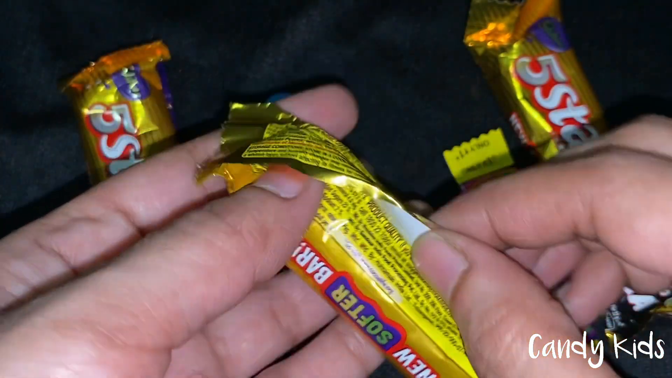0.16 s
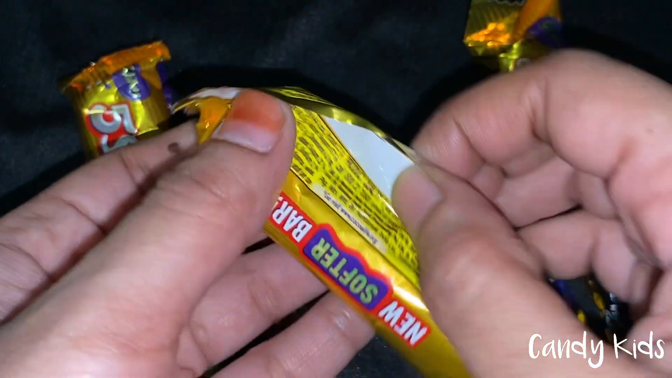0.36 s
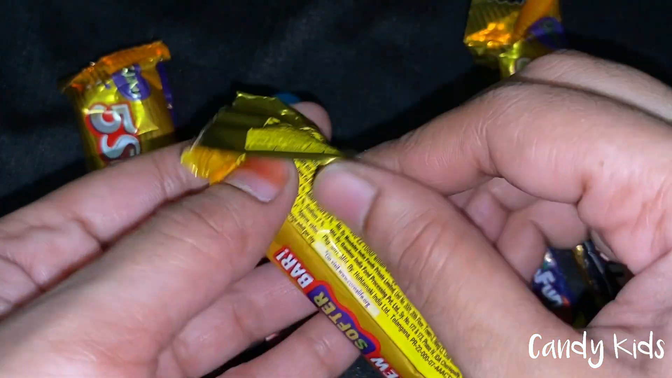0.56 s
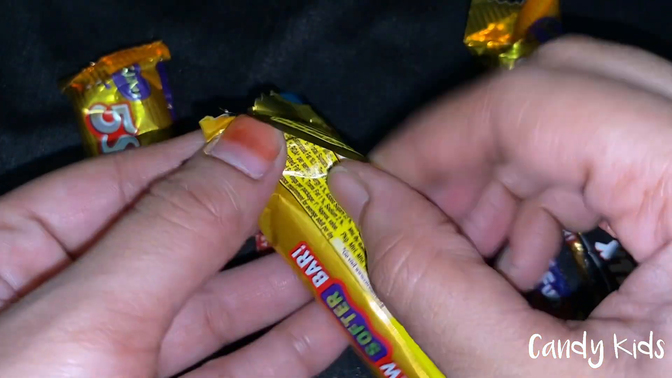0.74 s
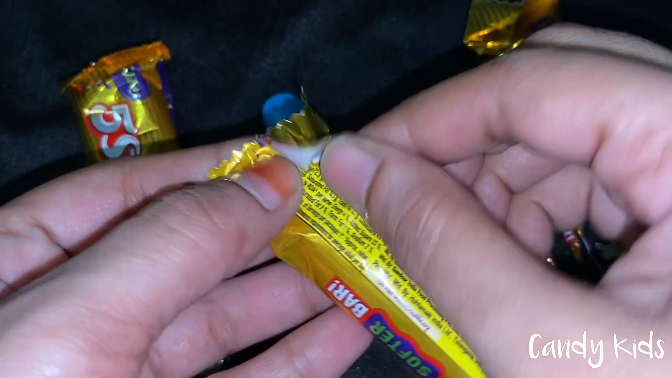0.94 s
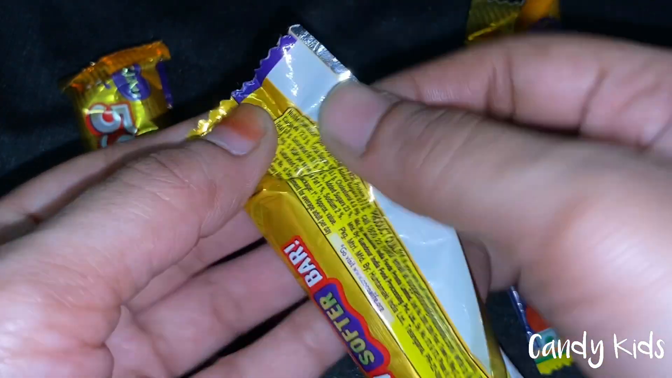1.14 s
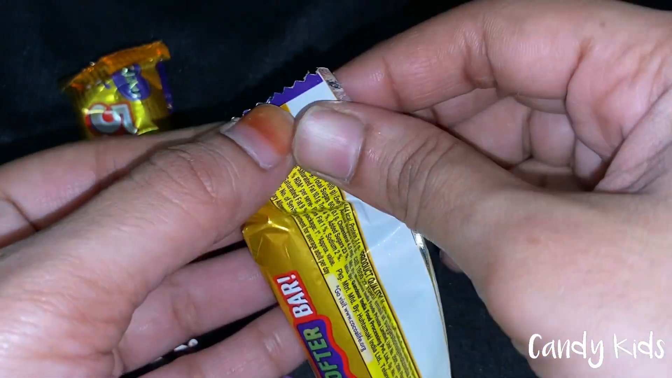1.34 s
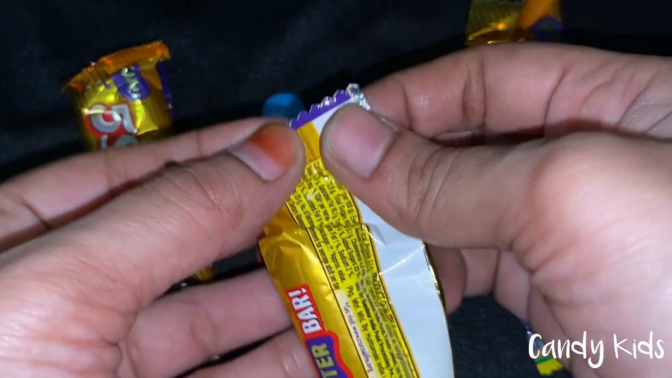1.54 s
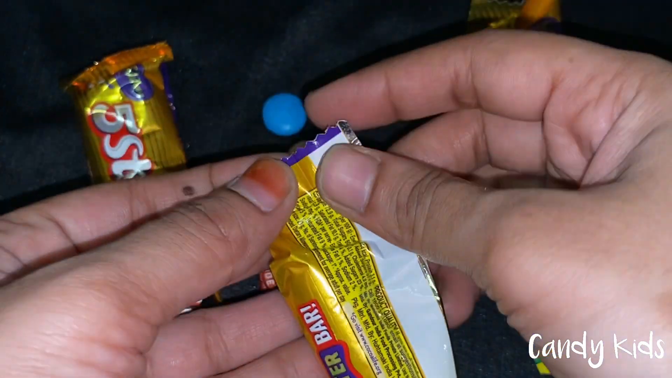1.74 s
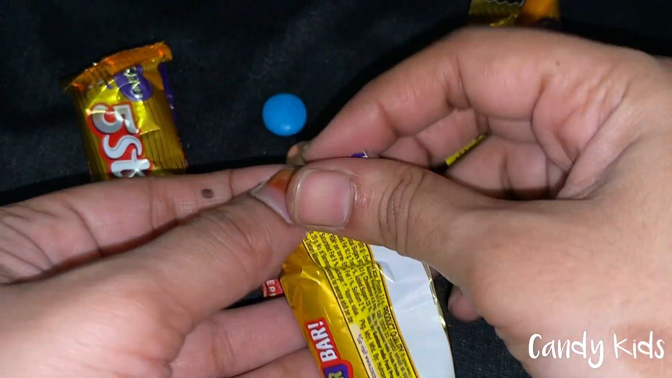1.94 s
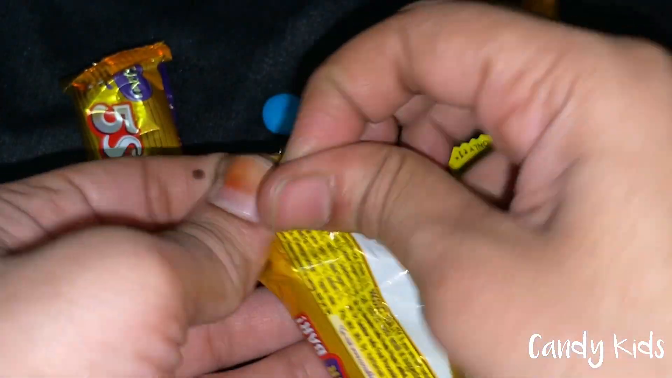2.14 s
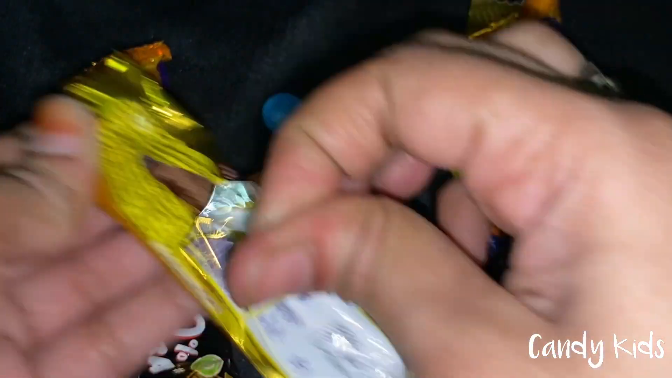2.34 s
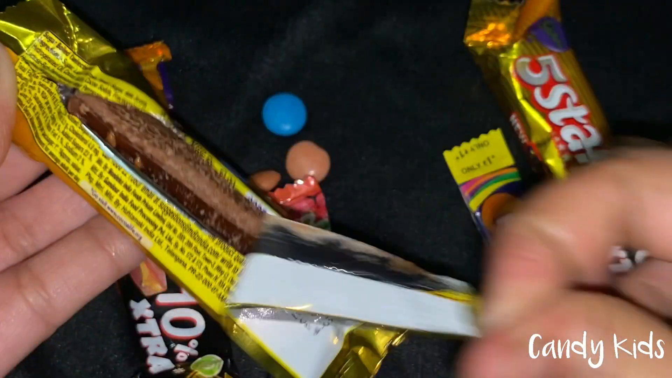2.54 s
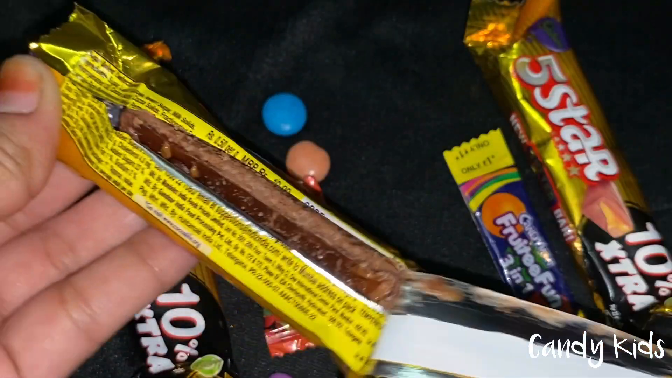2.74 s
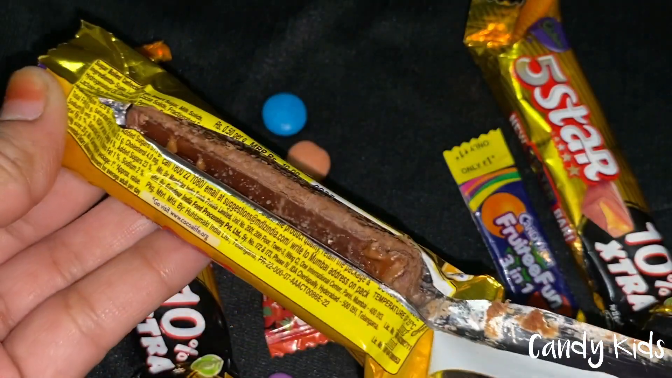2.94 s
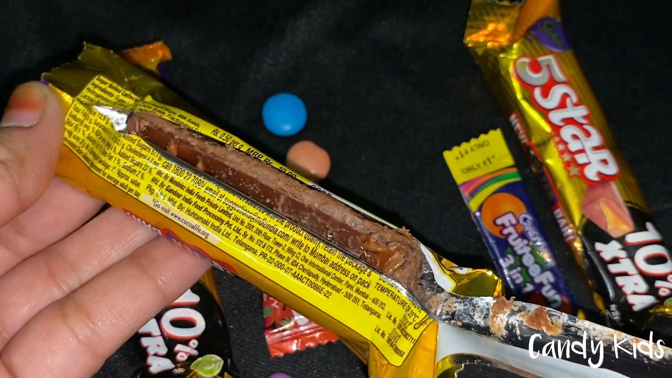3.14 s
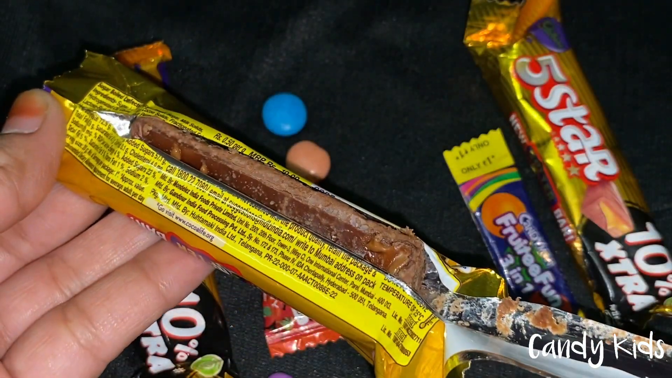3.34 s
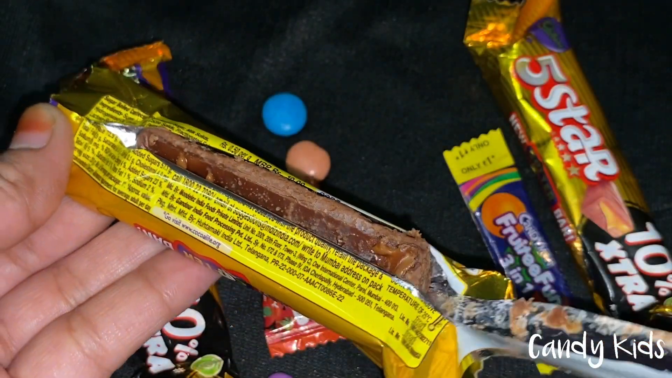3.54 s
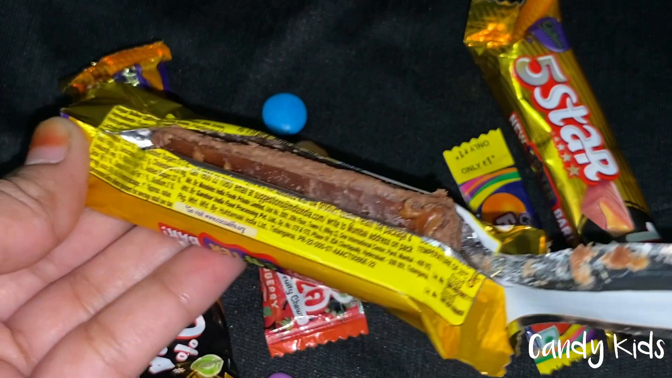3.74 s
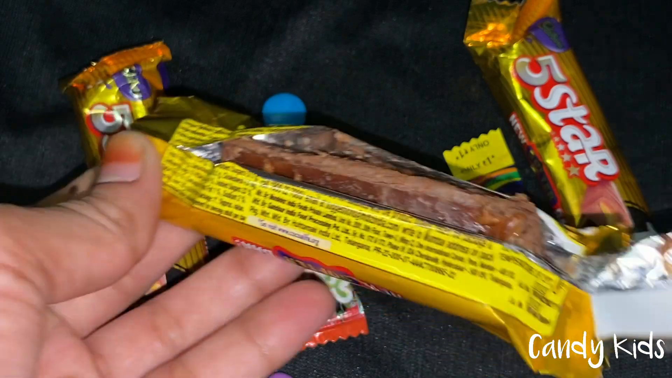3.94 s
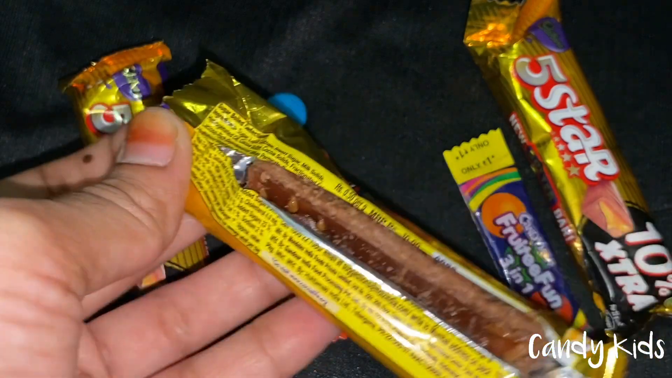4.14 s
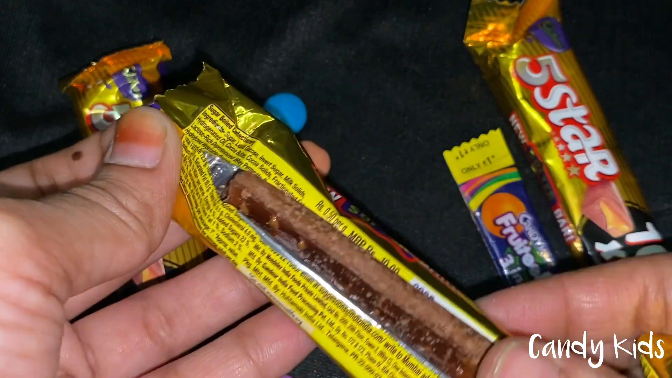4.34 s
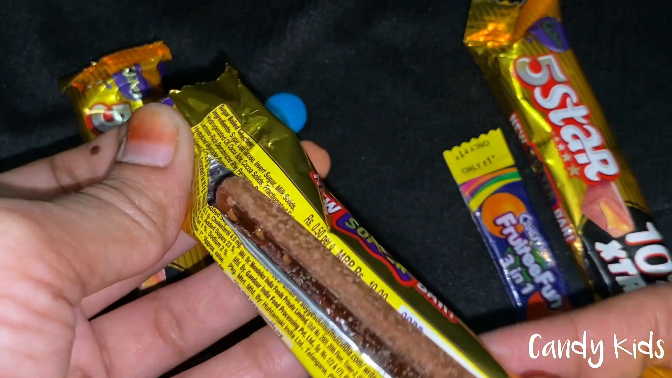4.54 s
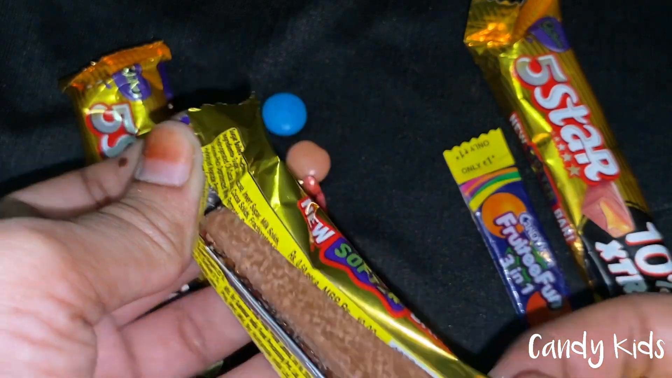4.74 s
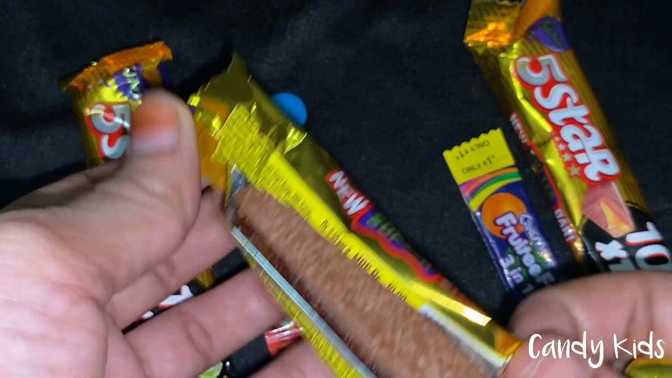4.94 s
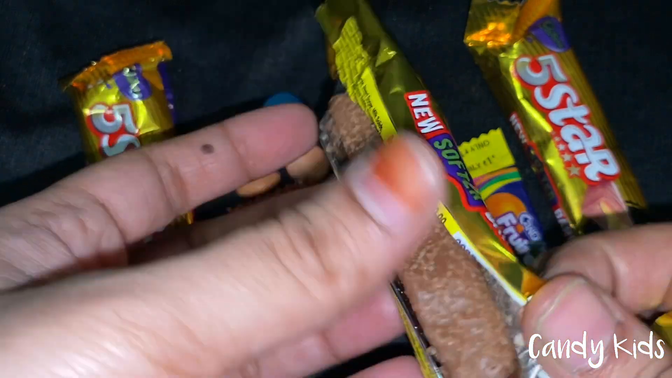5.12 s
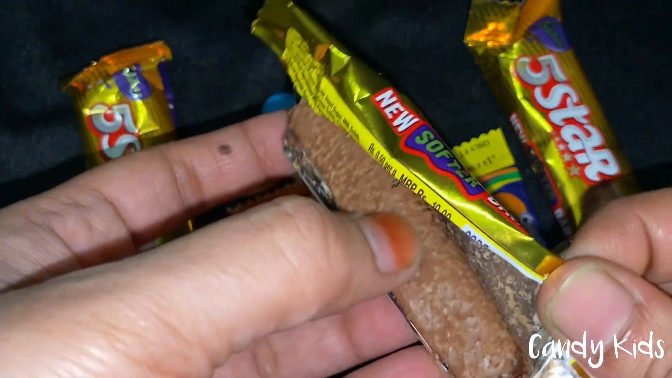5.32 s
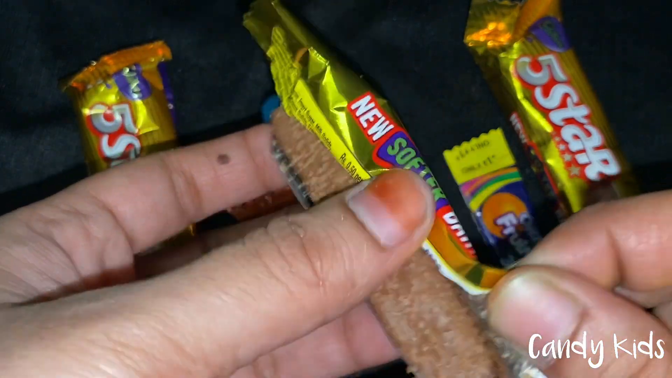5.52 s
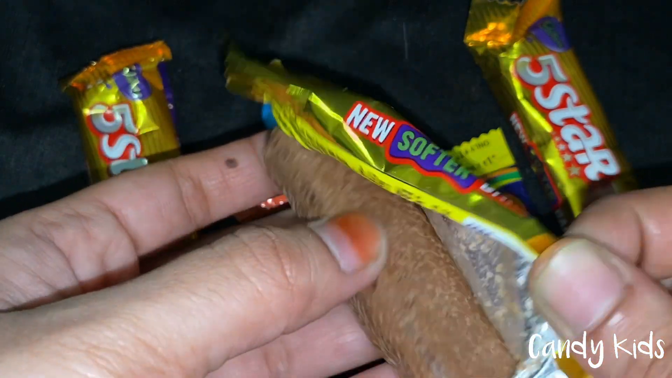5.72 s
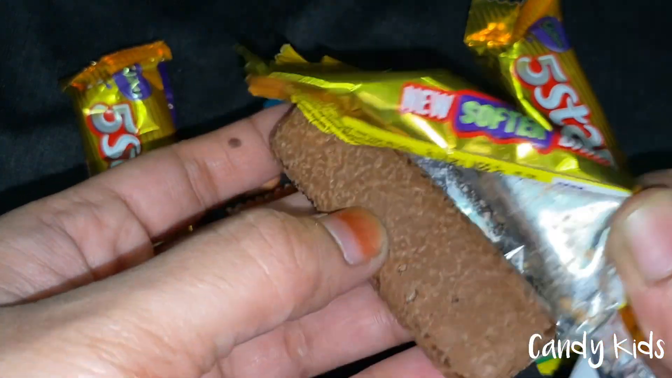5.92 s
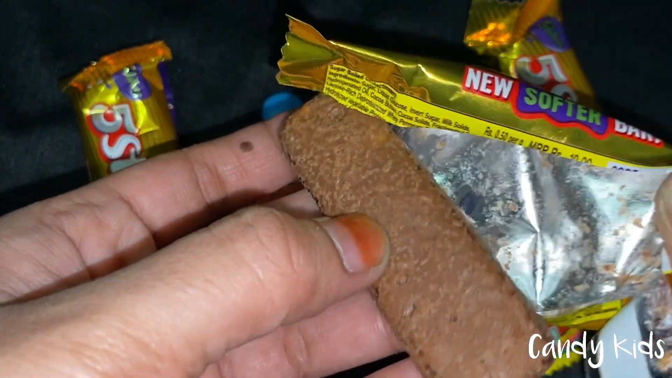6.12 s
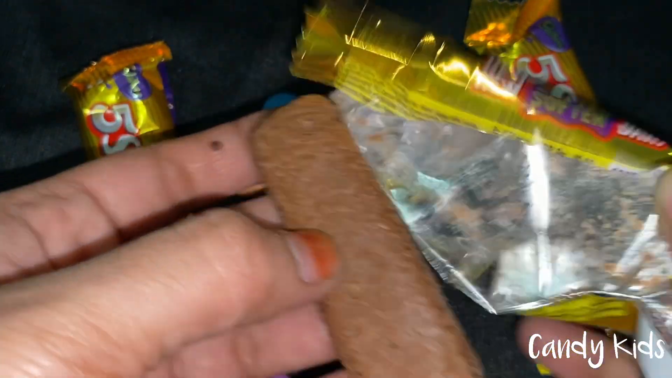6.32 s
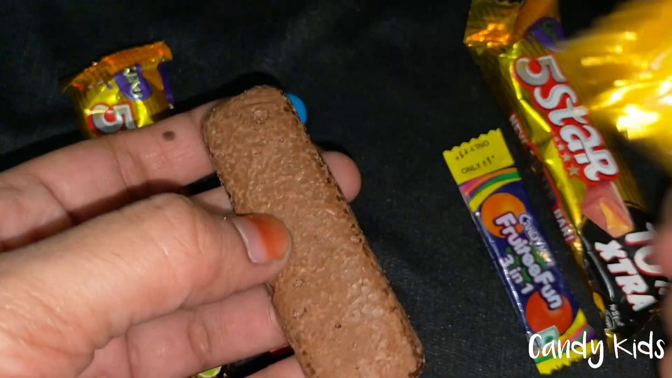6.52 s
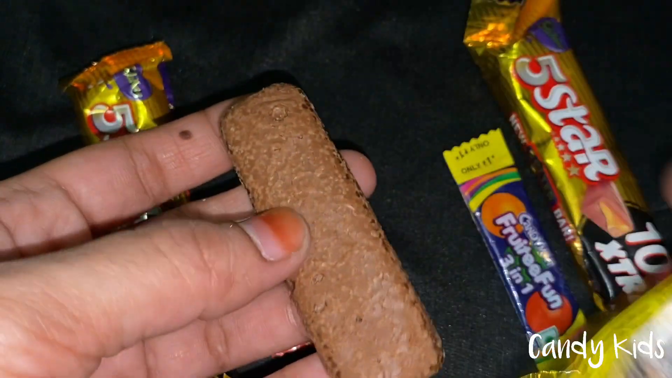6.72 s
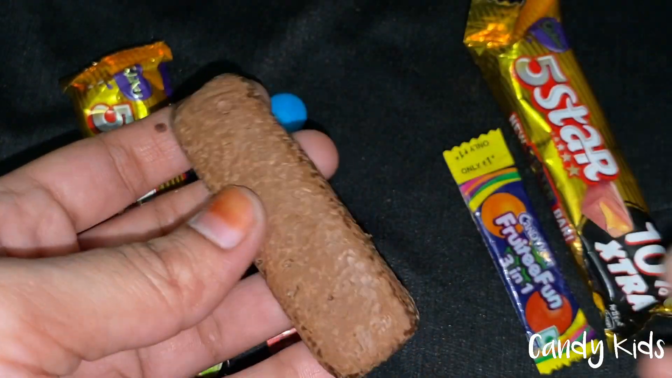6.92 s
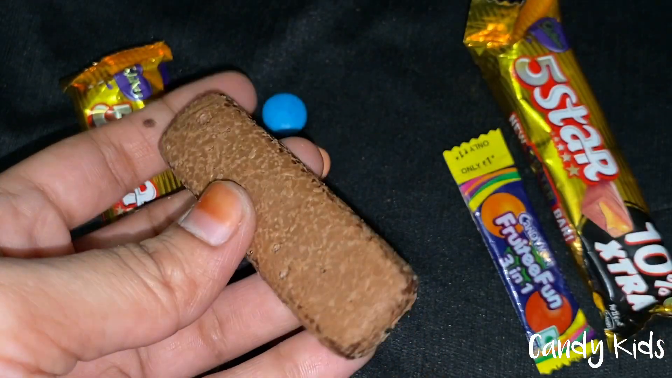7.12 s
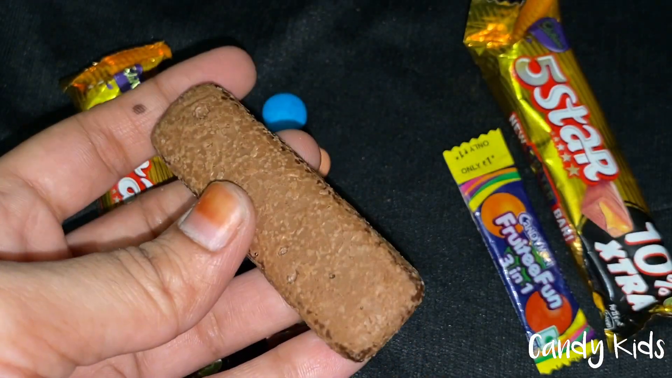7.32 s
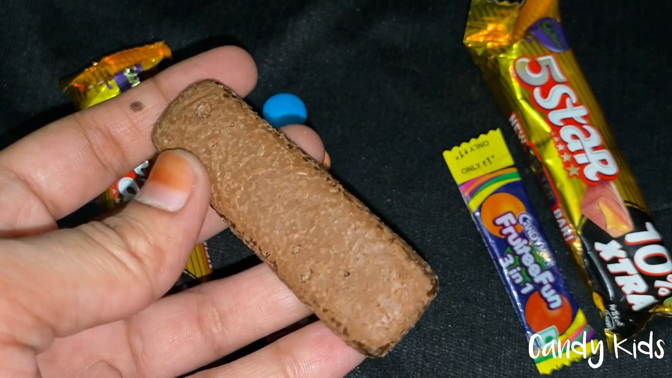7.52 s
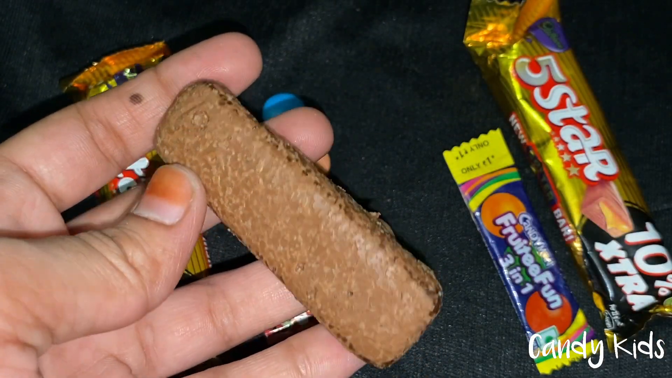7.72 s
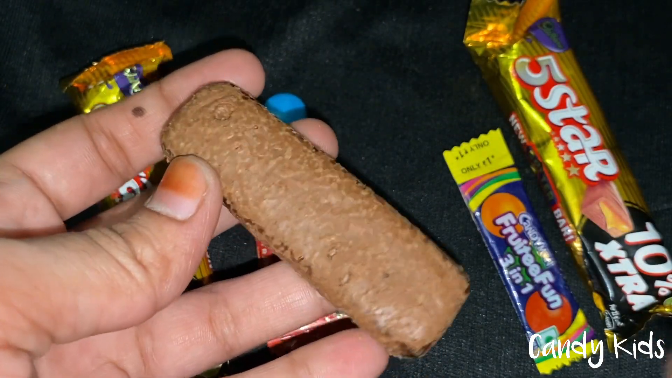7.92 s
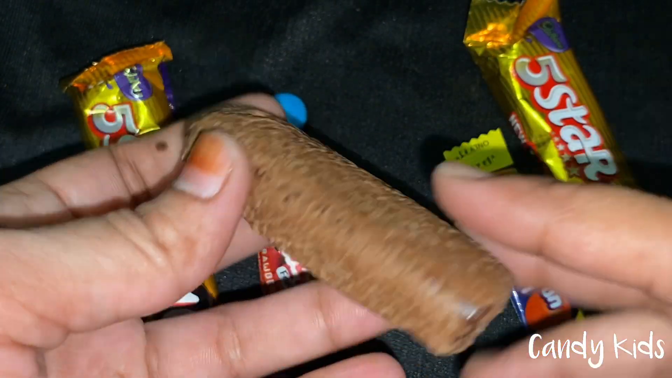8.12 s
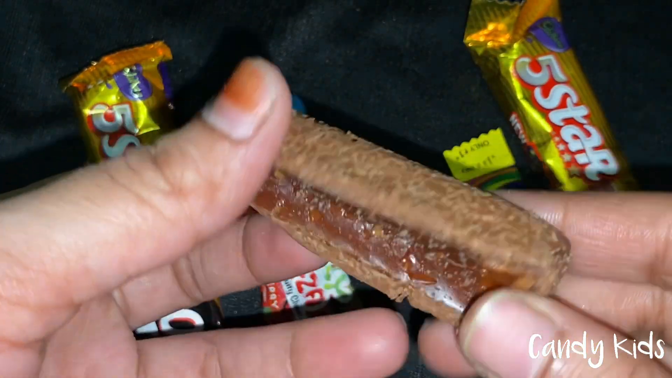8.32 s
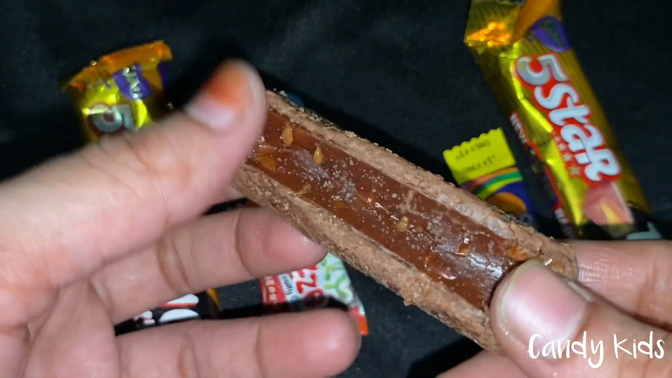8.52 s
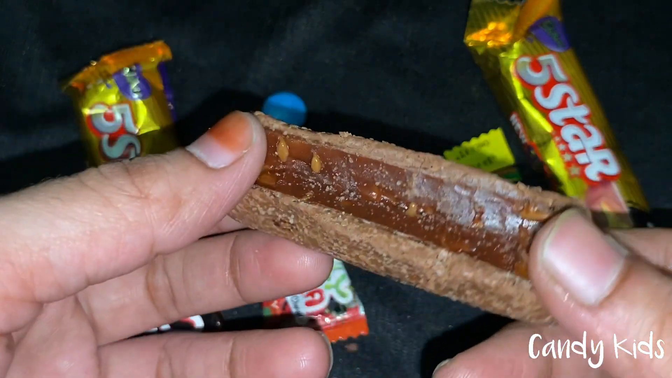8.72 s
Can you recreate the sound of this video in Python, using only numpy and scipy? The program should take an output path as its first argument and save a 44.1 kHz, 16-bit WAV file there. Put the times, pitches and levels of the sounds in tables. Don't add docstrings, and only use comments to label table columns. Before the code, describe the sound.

Very close stereo foil handling: sharp crease snaps over a bed of tiny crackles, pausing briefly, then tearing, spreading and sliding the bar out with low finger bumps. A dense crumple follows and the wrapper is dropped. Small birds whistle with echoes off walls in the first half; faint hum and distant rumble lie underneath.

```python
import sys
import numpy as np
from scipy import signal
from scipy.fft import rfft, irfft, next_fast_len
from scipy.io import wavfile

SR = 44100
rng = np.random.default_rng(int(sys.argv[2]) if len(sys.argv) > 2 else 0)


def generate_wav(signal):
    frames = np.transpose(np.atleast_2d(signal))
    scaled = np.clip(frames, -1, 1) * 32767
    pcm = np.round(scaled).astype(np.int16)
    wavfile.write(sys.argv[1], SR, pcm)


def how_loud(loudness_db):
    steps = np.asarray(loudness_db, float) / 20
    return 10 ** steps


N = 386316
TIME_S = np.arange(N) / SR
SIDES = np.array([[1], [-1]])
DROPPED_S = 7.6


def rms_one(x):
    return x / np.sqrt(np.mean(x ** 2) + 1e-20)


def at_hz(points, hz):
    table_hz, values = np.array(points).T[:2]
    return np.interp(np.log(np.maximum(hz, 1)), np.log(table_hz), values)


def band(x, low_hz, high_hz):
    edges_hz = [low_hz, min(high_hz, .45 * SR)]
    return signal.sosfilt(signal.butter(2, edges_hz, "band", fs=SR, output="sos"), x)


def ring(x, hz, width_hz):
    r = np.exp(-np.pi * width_hz / SR)
    feedback = [1, -2 * r * np.cos(2 * np.pi * hz / SR), r * r]
    return signal.lfilter([(1 - r * r) / 2, 0, (r * r - 1) / 2], feedback, x)


def bell(centre_s, half_s):
    return np.exp(-((TIME_S - centre_s) / half_s) ** 2)


def drift(rate):
    knots = rng.standard_normal(400)
    return np.interp(TIME_S * rate, np.arange(400), knots)


def echoes(x, t60, rise_s, alike, treble_loss_db=0):
    t = np.arange(SR) / SR
    mid, side = rng.standard_normal((2, SR)) * (1 - np.exp(-t / rise_s)) * how_loud(-60 * t / t60)
    alike = np.clip(alike, 0, 1)
    pair = np.sqrt(alike) * mid + np.sqrt(1 - alike) * side * SIDES
    dull = band(pair, 20, 4400)
    pair = dull + how_loud(-treble_loss_db * t) * (pair - dull)
    return signal.fftconvolve(pair / np.sqrt(np.sum(mid ** 2)), x[None], axes=1)[:, :N]


# (pitch [Hz], level [dB per Hz])
OUTDOORS = [(22, -23.5), (60, 4.5), (97, 3.5), (170, -4), (451, -19), (2910, -37.5), (3430, -35),
            (5570, -42.5), (11600, -42.5), (16000, -45)]
# (pitch [Hz], likeness [0 to 1])
LIKENESS = [(60, 1), (380, 0.67), (2380, 0.18), (8500, 0.18)]
# (pitch [Hz], level [dB rms])
HUM = [(50, -54), (100, -45.5), (150, -56)]
# (pitch [Hz], peak level [dB])
WHINES = [(2770, -73), (3130, -78), (3480, -76)]


def outdoors():
    hz = np.fft.rfftfreq(N, 1 / SR)
    alike = np.clip(at_hz(LIKENESS, hz), 0, 1)
    mid, side = rfft(rng.standard_normal((2, N))) * how_loud(at_hz(OUTDOORS, hz))
    noise = rms_one(irfft(np.sqrt(1 + alike) * mid + np.sqrt(1 - alike) * side * SIDES, N))
    hum, whine = np.zeros((2, N))
    for tone_hz, level_db in HUM:
        hum += how_loud(level_db + 0.5 * drift(3.4)) * np.sqrt(2) * np.sin(2 * np.pi * tone_hz * TIME_S)
    for tone_hz, level_db in WHINES:
        whine += how_loud(level_db + 3.0 * drift(8.7)) * np.sin(2 * np.pi * tone_hz * TIME_S)
    motor_on = np.clip(2 * (TIME_S - 7.6), 0, 1)
    return how_loud(-41 - 0.37 * TIME_S) * noise + how_loud(-6.0) * hum + motor_on * whine


# (time [s], half length [s], crackle level [dB])
SQUEEZES = [
    (2.213, 0.008, -22.5),
    (6.65, 0.022, -36),
    (7.433, 0.017, -26.5),
]
SETTLE_DB, SETTLE_S = -30, 0.017


def settling_power():
    s, peak_db, _ = np.transpose(SNAPS)
    marks = np.zeros(N)
    marks[(s * SR).astype(int)] = how_loud(peak_db + SETTLE_DB) ** 2
    power = signal.lfilter([1], [1, -np.exp(-1 / (SETTLE_S * SR))], marks + 1e-18)
    for at_s, half_s, db in SQUEEZES:
        power = power + how_loud(db) ** 2 * bell(at_s, half_s)
    return power


# (time [s], bright crackle [dB], dull crackle over bright [dB])
HANDLING = [(0, -37.5, -8.5), (.45, -28, -10), (1.001, -31.5, -13), (1.29, -100, -14.5), (1.67, -65, 9),
            (1.81, -48, -18.5), (2.301, -58.5, 12), (2.791, -37, -12), (2.921, -99.5, -6), (3.55, -115, 3),
            (3.701, -42, -9), (4.87, -50.5, -2.5), (5.31, -57.5, 6), (5.97, -52.5, 9.5), (7.1, -20, -16.5),
            (7.3, -33.5, -25), (7.939, -66.5, 15.5), (8.11, -79.5, 15)]
# (pitch [Hz], level [dB per Hz])
FOIL = [(180, -48), (300, -22.5), (2840, 7), (7020, 7.5), (9020, -16.5), (15200, -4), (16500, -19)]
# (time [s], half length [s], level over the usual hiss [dB])
RUBS = [
    (1.816, 0.051, 28.5),
    (6.306, 0.032, 22.5),
]
# (from [s], to [s])
STILL = [
    (2.53, 2.7),
    (3.65, 4.02),
    (7.56, 9),
]
SETTLE_DULL_DB = -15
SQUEEZE_HISS_DB = 20
STILL_CLICK_DB = -6.5


def crackle():
    s, *levels = np.transpose(HANDLING)
    hands_db, dullness_db = (np.interp(TIME_S, s, column) for column in levels)
    settling = settling_power()
    bright_db = 10 * np.log10(how_loud(hands_db) ** 2 + settling)
    dull_db = 10 * np.log10(how_loud(hands_db + dullness_db) ** 2 + how_loud(SETTLE_DULL_DB) ** 2 * settling)

    sizes = how_loud(3.5 * np.minimum(rng.exponential(1, N), 3.2)) * rng.choice([-1, 1], N)
    clicks_per_s = 550 * how_loud(6.5 * drift(30))
    clicks = sizes * (rng.random(N) < clicks_per_s / SR)
    still = sum((TIME_S > from_s) & (TIME_S < to_s) for from_s, to_s in STILL)
    clicks = clicks * how_loud(STILL_CLICK_DB * still)

    slide_db = np.full(N, -3.5)
    for at_s, half_s, db in RUBS:
        slide_db += db * bell(at_s, half_s)
    for at_s, half_s, _ in SQUEEZES:
        slide_db += SQUEEZE_HISS_DB * bell(at_s, half_s)
    slide = how_loud(slide_db) * rng.standard_normal(N)

    dealt, out = rng.integers(0, 14, N), 0
    for k, hz in enumerate(np.geomspace(450, 15000, 14)):
        moved = clicks * (abs(dealt - k) < 2)
        facet = ring(rms_one(moved) + slide, hz, 0.48 * hz)
        bright = np.clip(np.log(hz / 1200) / np.log(8.5), 0, 1)
        reference_db = at_hz(FOIL, 688) * (1 - bright) + at_hz(FOIL, 7340) * bright
        level_db = (dull_db - 6.5) * (1 - bright) + (bright_db - 12.0) * bright
        level_db = level_db + at_hz(FOIL, hz) - reference_db
        lean_db = 2.1 * (-1) ** (k // 2) * SIDES
        out = out + (-1) ** k * how_loud(level_db + lean_db) * rms_one(facet)
    return out


# (time [s], length [s], level [dB], from [Hz], up to [Hz])
RISING = [(.08, 0.074, -6.5, 3990, 4210), (.205, 0.031, -10.5, 3480, 3890), (.465, 0.048, -20, 4050, 4390),
          (.94, 0.048, -21, 7100, 8030), (1.36, 0.063, -22.5, 6500, 7570), (2.685, .06, -33, 3200, 3400),
          (2.985, 0.04, -27, 3166, 3500), (3.22, 0.15, -28.5, 5290, 5760), (3.92, 0.053, -36.5, 3700, 4030),
          (3.455, 0.14, -23.5, 2713, 3128), (3.705, 0.024, -34, 5050, 5180),
          (3.965, 0.11, -21.5, 4310, 5070), (4.15, 0.19, -30.5, 2900, 3497), (4.47, 0.055, -35, 4250, 4850),
          (4.84, 0.1, -33.5, 3075, 3520), (4.97, 0.081, -25.5, 3830, 4650),
          (5.62, 0.076, -24.5, 4260, 4500)]
# (time [s], length [s], level [dB], from [Hz], to [Hz])
FALLING = [(0, 0.015, -30.5, 7700, 7730), (0, 0.0077, -21, 7050, 6620), (.29, 0.023, -23.5, 3690, 3470),
           (.37, 0.015, -21, 3645, 3560), (.068, 0.021, -23.5, 3730, 3940), (1.19, 0.041, -48, 3880, 3690),
           (.435, 0.038, -22, 3470, 3480), (.61, 0.09, -34.5, 8000, 7600), (1.0, 0.036, -26.5, 7250, 6700),
           (1.415, 0.024, -25, 7760, 6130), (1.355, 0.056, -39, 4020, 3440),
           (1.545, 0.061, -49, 4400, 3500), (1.75, 0.069, -51, 4220, 3670), (1.955, 0.065, -52, 4300, 3800),
           (3.725, 0.037, -32, 4460, 3270), (3.94, 0.066, -40.5, 5230, 4550),
           (4.25, .16, -40.5, 3600, 3868), (4.82, 0.046, -41.5, 3570, 3120), (5.53, 0.11, -43, 6870, 6600),
           (5.76, 0.22, -52, 6740, 6600)]
# (time [s], length [s], level [dB], low [Hz], high [Hz])
LEAPING = [
    (2.595, 0.092, -30, 3780, 5050),
    (2.885, 0.108, -26.5, 3660, 5115),
]
# (share of length [0 to 1], share of pitch span [0 to 1], level [dB])
RISE = [(0, 0.21, -29), (0.401, .45, -7.5), (.8, 1, -7), (1, 0.33, -7)]
FALL = [(0, 0.094, 8.5), (.2, .15, 5.5), (0.598, 0.66, 2.5), (1, 0.89, 5)]
LEAP = [(0, 0.068, -15.5), (.44, 0.15, -2), (0.65, 0.98, -4), (.8, 0.92, -6), (.96, .22, 2), (1, 0.2, -8)]


def birds():
    near, far, clear = np.zeros((3, N))
    for calls, shape in ((RISING, RISE), (FALLING, FALL), (LEAPING, LEAP)):
        share, span, shape_db = np.transpose(shape)
        for start_s, length_s, peak_db, from_hz, to_hz in calls:
            s = start_s + length_s * share
            hz = from_hz + (to_hz - from_hz) * span
            i = np.arange(round(s[0] * SR), round(s[-1] * SR))
            fade = np.minimum(1, np.minimum(i - i[0], i[-1] - i) / 300)
            loudness = how_loud(np.interp(i / SR, s, peak_db + shape_db))
            turns = np.cumsum(np.interp(i / SR, s, hz)) / SR
            if s[0] < 2 and hz[0] < 5000:
                song = near if s[0] < 1 else clear
            else:
                song = far
            song[i] += fade * loudness * np.sin(2 * np.pi * turns)
    flutter = rms_one(band(rng.standard_normal(N), 28, 140))
    far = far * (1 + 0.15 * flutter)
    walls = echoes(far + how_loud(-6.5) * near, treble_loss_db=86, t60=0.33, rise_s=0.023, alike=0.43)
    close = near + clear * (1 + flutter / 2)
    return (how_loud(-2.0) * far + how_loud(-2.5) * close + how_loud(8.5) * walls) * how_loud(-1.5 * SIDES)


# (time [s], peak level [dB], centre of colour [Hz])
CREASES = [(0.0944, -2.5, 4220), (0.1043, -3, 6140), (0.1192, -0.5, 5300), (0.1327, -8.5, 3260),
           (0.1652, 3.5, 5900), (0.2103, -4, 4700), (0.2162, -5, 4430), (0.2384, -1, 5400),
           (0.2457, -3, 3530), (0.3258, -0.5, 5260), (0.3378, -5, 5010), (0.3857, 1.5, 6300),
           (0.4134, -7, 4100), (0.4594, -1.5, 4200), (0.4859, 0, 4130), (0.4967, 0.5, 3150),
           (0.5236, -2, 6100), (0.5781, -11, 5600), (0.5896, -9.5, 4700), (0.6106, -0.5, 5420),
           (0.6211, -2.5, 5650),
           (0.7006, -1, 2690), (0.755, -5.5, 3280), (0.804, -6.5, 7030), (0.812, -14.5, 2410),
            (0.828, -3, 5000), (0.841, -5.5, 3970), (0.863, -19, 4420), (0.875, -12, 5600),
            (0.902, -5.5, 7750), (0.9085, -7, 4940), (0.965, -5, 3840), (0.984, -9.5, 7320),
            (0.9931, -0.5, 4040), (1.071, -4, 5170), (1.1173, 1, 4950), (1.1305, 1.5, 5470),
            (1.1795, 0.5, 4800), (1.2824, -23, 2920), (1.3374, -8, 3800), (1.359, -11, 3730),
            (1.4001, -3, 3180), (1.4732, -12, 7500), (1.476, 0.5, 4440),
           (1.7455, -9.5, 7400), (1.882, -7, 4330), (1.9117, -7.5, 3580), (1.965, -14.5, 2700),
           (1.9994, -1.5, 6200), (2.054, -9, 6450), (2.1369, 1, 5440), (2.181, -9, 7550),
           (2.212, -7.5, 5120), (2.2186, 3.5, 5360), (2.238, 5, 5820), (2.3147, -5.5, 6990),
           (2.345, -6.5, 5100), (2.3918, -35, 2290), (2.4027, -6.5, 7680), (2.461, -15, 8430),
           (2.488, -1, 7060), (2.4928, -5.5, 5860), (2.514, -5, 6800), (2.707, -7, 6670),
           (2.7237, -5.5, 7820), (2.7283, -8, 7150), (2.7555, -11.5, 9230), (2.7721, -1, 5600),
           (2.8554, -10, 4480),
           (3.6165, -11.5, 6200), (3.6355, -24, 5280), (3.639, -11, 4900), (3.8395, -14, 3700),
             (3.858, -14.5, 8740), (4.034, -3, 6800), (4.052, -4, 6660), (4.1015, -11.5, 4070),
             (4.1285, -16, 6000), (4.2077, -10, 5800), (4.2203, -3.5, 6200), (4.2407, -9.5, 4540),
             (4.2516, -10.5, 4050), (4.296, -10.5, 6060), (4.3018, -1, 6360), (4.3842, -15.5, 5870),
             (4.4927, -10, 4870), (4.5498, -14.5, 5230), (4.59, -15, 2180), (4.666, -0.5, 6200),
             (4.6953, -3, 6460), (4.7163, 0, 4300), (4.7515, -7, 8350), (4.7784, -12, 6300),
             (4.8561, -8, 5470), (4.865, -3, 3900), (4.8763, -8, 6970), (4.902, -14.5, 4230),
           (5.055, -4, 5600), (5.1772, -8.5, 3370), (5.204, -4, 6100), (5.3352, 0.5, 5360),
               (5.4212, -0.5, 5060), (5.465, -9.5, 5800), (5.556, -15.5, 4720), (5.607, -18, 3000),
               (5.6548, -9, 5630), (5.673, -17.5, 4500), (5.687, -5.5, 5660), (5.749, -4.5, 5930),
               (5.801, -7, 4900), (5.8058, -1, 4450), (5.8116, -11.5, 6210), (5.857, -24, 2100),
               (5.8756, 0, 5460), (5.881, -7, 5110), (5.8998, -9.5, 6670), (5.963, -2.5, 3160),
               (5.981, 2.5, 4600), (6.063, -24, 3190), (6.0726, -15, 3240), (6.1173, -14, 4600),
               (6.1549, -8.5, 2950), (6.2042, -14, 2370), (6.2088, -7.5, 4030),
           (6.3193, -9.5, 3360), (6.331, -17, 3940), (6.4025, -7, 6740), (6.4463, 1, 5950),
             (6.4548, -2, 6700), (6.5108, -7.5, 4690), (6.537, -2.5, 7530), (6.6074, -3, 5880),
             (6.6378, -1.5, 5280), (6.6547, 2.5, 3450), (6.6586, 5.5, 3240), (6.7083, -4, 5200),
             (6.747, -19.5, 2100), (6.7638, -8, 7470), (6.7914, -25, 3310), (6.8222, -3.5, 3810),
             (6.8258, -7, 4230), (6.8311, -5, 4230), (6.8372, -30, 3940), (6.8447, -8, 5220),
             (6.8946, -14, 3840), (6.9056, -12.5, 5460), (6.931, -1, 3100), (6.9644, -1.5, 7100),
           (7.0347, -3.5, 3620), (7.0551, -2.5, 3720), (7.0827, 3.5, 5250), (7.1157, 1.5, 5260),
            (7.1272, 0, 5960), (7.154, -3.5, 4540), (7.1621, 0, 4930), (7.2638, -11.5, 7240),
            (7.302, -10.5, 6440), (7.317, -12, 6480), (7.345, -17.5, 6850), (7.365, -11.5, 4660),
            (7.4113, -13.5, 3800), (7.431, -8.5, 3900), (7.5175, -6.5, 6200), (7.524, -13.5, 4230),
            (7.662, -13.5, 4650), (7.7915, -23, 5930), (7.856, -20, 3600), (7.9236, -15.5, 6700),
            (7.938, -22, 8090), (8.249, -22, 4730), (8.7011, -11.5, 3900)]
SNAPS = CREASES
# (time [s], peak level [dB], centre of colour [Hz])
TICKS = [(0.0541, -9, 2720), (0.3505, -16, 5120), (0.5049, -5.5, 4680), (0.5375, -7.5, 5160),
         (0.5564, -18.5, 4030), (0.5624, -12, 5190), (0.5856, -2, 4990), (0.6063, -14, 4140),
         (0.716, -20, 4560), (0.75, -9.5, 4600), (0.7994, -12, 4300), (0.925, -5.5, 5370),
         (0.9565, -8.5, 5300), (0.9706, -9.5, 6850), (0.9857, -3, 7290), (1.0306, -4, 4710),
         (1.3281, -16.5, 3020), (1.4271, -9, 4770), (1.4673, -11, 6000), (2.0369, -24, 3830),
         (2.1001, -17.5, 3640), (2.2288, -9.5, 6480), (2.2943, -6, 5360), (2.3783, -15, 5660),
         (2.4245, -18, 4190), (2.442, -18, 6500), (2.558, -14, 4560), (2.667, -17, 2470),
         (2.686, -18.5, 6800), (2.788, -21, 3000), (3.354, -36, 3500), (3.6737, -27, 4970),
         (3.7315, -25.5, 6260), (4.0936, -12, 4020), (4.267, -15, 5500),
         (4.941, -16, 3340), (5.0575, -15, 5570), (5.1234, -14.5, 7120), (5.1435, -14, 5300),
                    (5.2447, -13.5, 6330), (5.3921, -10, 3570), (5.5158, -19.5, 6300),
                    (5.5298, -10.5, 5700), (5.5717, -5, 9440), (5.6785, -10.5, 4400), (5.73, -6, 7320),
                    (5.756, -7.5, 4300), (5.7767, -19, 5580), (5.811, -2.5, 6020), (5.8315, -8, 6430),
                    (5.8701, -11.5, 4700), (5.894, -10.5, 3500), (5.9455, -11.5, 3920), (5.9905, -27, 4680),
                    (6.0292, -11, 5040), (6.066, -18, 3870), (6.135, -14, 4500), (6.323, -4, 4020),
                    (6.4103, -11, 4320), (6.437, -16.5, 4370), (6.4767, -14.5, 3500), (6.491, -13, 4690),
                    (6.5, -19.5, 4530), (6.5735, -24.5, 3340), (6.6635, -2.5, 4150), (6.6982, -3, 4650),
                    (6.714, -9, 5050), (6.7256, -8.5, 4830), (6.7946, -11.5, 3630), (6.8029, -7.5, 4970),
                    (6.8968, -10.5, 4024), (6.9483, -7, 3800), (7.0108, -5.5, 4240), (7.079, -2, 5660),
                    (7.085, 1, 2700), (7.09, -3, 2600), (7.138, -8, 3690), (7.1826, -11, 4030),
                    (7.1928, -6.5, 8100), (7.2103, -9.5, 6750), (7.2205, -22, 6870), (7.4267, -13, 4530),
                    (7.444, -14, 4350), (7.451, -17, 4180), (7.463, -16, 5060), (7.5, -20.5, 7500),
                    (7.5475, -14.5, 3780), (7.573, -15.5, 3930), (7.653, -24, 2680), (7.829, -26.5, 4030),
                    (7.918, -16.5, 1790)]
DROPPED_EDGE_DB = -27


def snaps(creases):
    out, t = np.zeros((2, N + 900)), np.arange(900) / SR
    for s, peak_db, hz in creases:
        chance, sideways = rng.standard_normal(900), rng.standard_normal()
        burst = chance * (t / .0004) ** 2 * np.exp(-t / .0004)
        octaves = np.log2(hz / 5500)
        facet_hz = min(0.95 * hz, 7000)
        neighbour_hz = np.clip(facet_hz * 2 ** (0.64 * chance[0]), 1700, 8000)
        body = ring(burst, facet_hz, 0.63 * facet_hz) + how_loud(3) * ring(burst, neighbour_hz, 950)
        thud = band(burst, 570, 4600)
        edge = band(burst * np.exp(-t / 0.00033), 3800, 16220)
        lean = how_loud(2.0 * sideways * SIDES)
        body, thud = body * lean, thud * lean
        thud_db = -27 - 3.9 * octaves
        edge_db = -9 + 5.8 * octaves + DROPPED_EDGE_DB * (s > DROPPED_S)
        snap = body / np.abs(body).max()
        snap = snap + how_loud(thud_db) * thud / np.abs(thud).max()
        snap = snap + how_loud(edge_db) * edge / np.abs(edge).max()
        i = round(s * SR)
        out[:, i:i + 900] += how_loud(peak_db - 1.5) * snap / np.abs(snap).max()
    return out[:, :N]


# (time [s], peak level [dB], ring [Hz])
POPS = [(0.25, -8.5, 1540), (0.3497, -20.5, 1470), (0.468, -9, 1650), (0.495, -27, 1330),
        (0.624, -19, 1620), (0.7562, -13.5, 1590), (0.8123, -10, 1090), (0.875, -17.5, 1000),
        (0.9084, -17.5, 880), (1.9665, -22, 1420), (2.2373, -23.5, 1530), (2.2726, -10.5, 1620),
        (2.2965, -16.5, 1180), (2.36, -20, 950), (2.393, -21.5, 596), (2.411, -23.5, 550),
        (2.5162, -17, 1210), (3.558, -35, 1310), (3.6412, -21.5, 1170), (3.759, -26.5, 1800),
        (3.993, -27.5, 1100), (4.051, -21, 1000), (4.1023, -14.5, 960), (4.2226, -19.5, 1470),
        (4.2408, -11, 1650), (4.2678, -19, 1230), (4.5921, -15.5, 1660), (4.6953, -10, 1240),
        (4.717, -18, 1580), (4.867, -15, 1470), (4.8769, -15.5, 1250), (5.204, -18, 920),
        (5.337, -17, 1650), (5.3921, -29.5, 1360), (5.557, -19.5, 1440), (5.8068, -15.5, 885),
        (5.8327, -17, 1550), (5.9448, -15, 1440), (5.963, -11, 1630), (5.977, -12.5, 900),
        (6.0744, -15.5, 1060), (6.154, -13, 1350), (6.2, -19.5, 1610), (6.241, -18, 1480),
        (6.319, -19, 1450), (6.4539, -9.5, 1340), (6.533, -12, 1660), (6.6588, -14, 1210),
        (6.6762, -11.5, 1070), (6.8192, -11.5, 1040), (7.011, -16, 1150), (7.0844, -18, 1560)]


def pops():
    out, t = np.zeros((2, N + 900)), np.arange(900) / SR
    for s, peak_db, hz in POPS:
        chance, sideways = rng.standard_normal(900), rng.standard_normal()
        burst = chance * t * np.exp(-t / 0.00068)
        pop = band(ring(burst, hz, 1.7 * hz), 570, 3300)
        level = how_loud(peak_db - 2.5 + 1.4 * sideways * SIDES)
        i = round(s * SR)
        out[:, i:i + 900] += level * pop / np.abs(pop).max()
    return out[:, :N]


# (time [s], peak level [dB], ring [Hz])
BUMPS = [
    (0.808, -19, 875),
    (2.344, -10, 560),
    (2.378, -5.5, 610),
    (2.443, -11.5, 566),
    (4.878, -10.5, 524),
    (5.975, -0.5, 656),
    (6.073, -2, 690),
    (6.157, -3, 223),
    (6.32, -5.5, 821),
    (7.434, -11.5, 347),
]


def bumps():
    out, t = np.zeros(N), np.arange(1800) / SR
    for s, peak_db, hz in BUMPS:
        knock = ring(np.exp(-t / 0.0026), hz, 1.0 * hz)
        i = round(s * SR)
        out[i:i + 1800] += how_loud(peak_db - 13.0) * knock / np.abs(knock).max()
    return out


POCKET_HZ, POCKET_WIDTH_HZ, POCKET_DB = 2570, 390, -1
POCKET_S, POCKET_HALF_S = 6.95, 0.2
DROPPED_ROOM_DB = 9


def in_room(foil):
    hollow = how_loud(POCKET_DB) * bell(POCKET_S, POCKET_HALF_S)
    foil = foil + ring(hollow * foil, POCKET_HZ, POCKET_WIDTH_HZ)
    sent = foil.mean(axis=0) * how_loud(DROPPED_ROOM_DB * (TIME_S > DROPPED_S))
    return foil + how_loud(-15) * echoes(sent, t60=.26, rise_s=.002, alike=.7)


def scene():
    loud = in_room(snaps(SNAPS) + crackle() + bumps()) + birds() + outdoors()
    return loud + in_room(snaps(TICKS) + pops())


def band_limit(x):
    return signal.sosfilt(signal.butter(12, 17110, fs=SR, output="sos"), x)


# (pitch [Hz], level [dB])
LEFT_LEAD = [(60, 4), (380, 4), (2380, 2), (15000, -0.5)]


def record(dry):
    size = next_fast_len(N + 2000)
    hz = np.fft.rfftfreq(size, 1 / SR)
    early_s = .000235
    lead = np.exp(2j * np.pi * early_s * (np.clip(hz, 6900, 15700) - 6900))
    tilt = how_loud(at_hz(LEFT_LEAD, hz) / 2)
    ports = irfft(rfft(dry, size) * [tilt, lead / tilt], size)[:, :N]
    cut = signal.sosfilt(signal.cheby2(10, 40, 16700, fs=SR, output="sos"), ports)
    return band_limit(np.clip(cut, -1, 1))


dry = scene()
out = record(dry)
generate_wav(out)
```